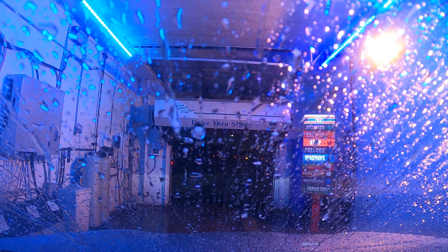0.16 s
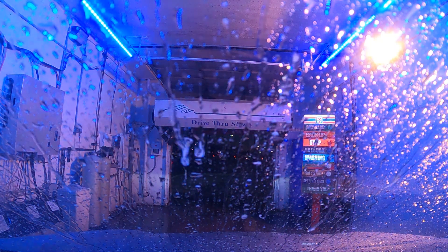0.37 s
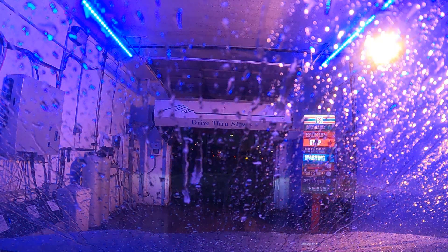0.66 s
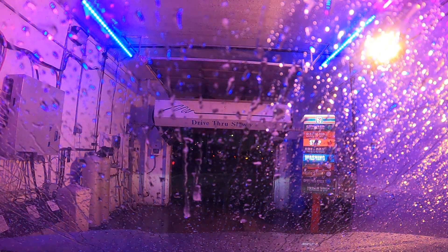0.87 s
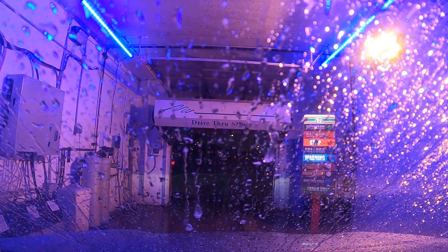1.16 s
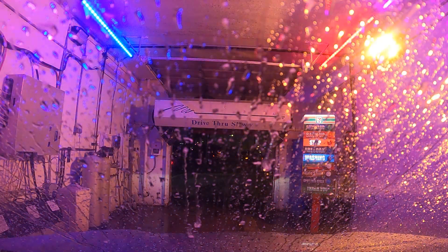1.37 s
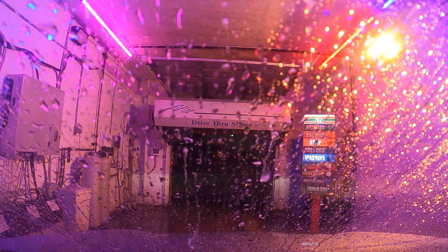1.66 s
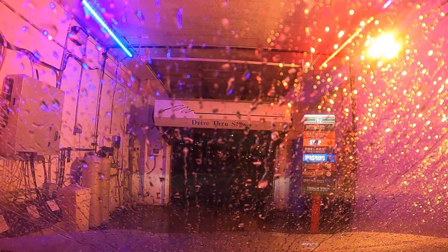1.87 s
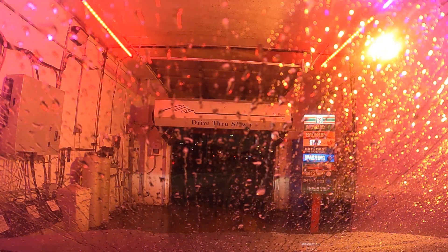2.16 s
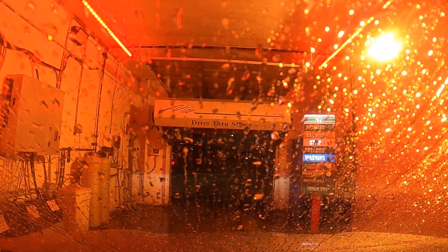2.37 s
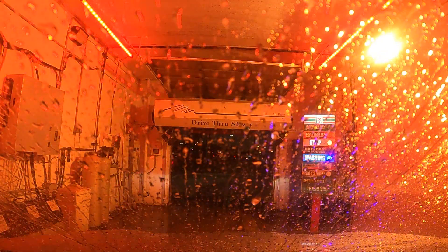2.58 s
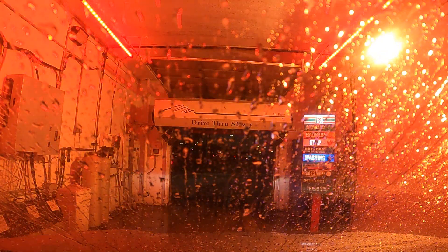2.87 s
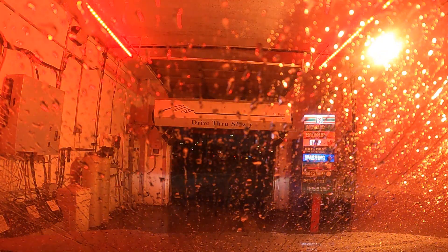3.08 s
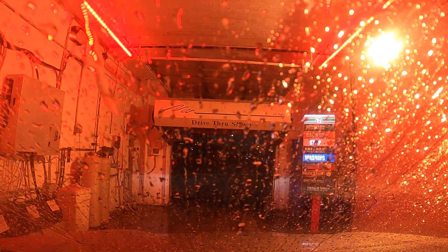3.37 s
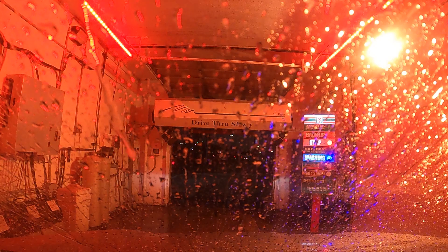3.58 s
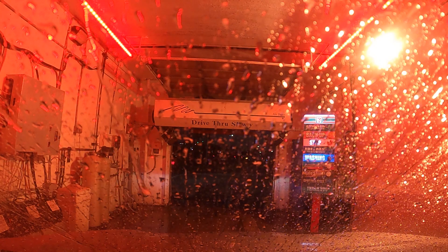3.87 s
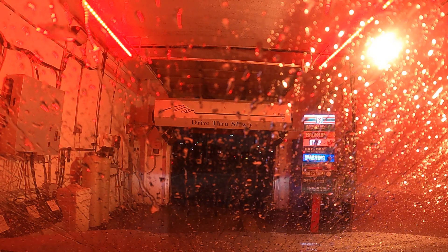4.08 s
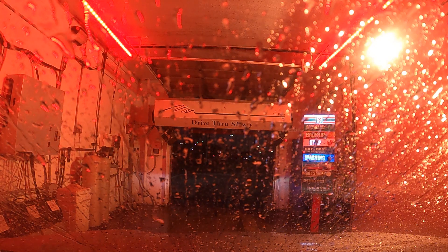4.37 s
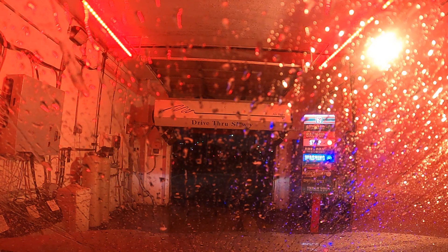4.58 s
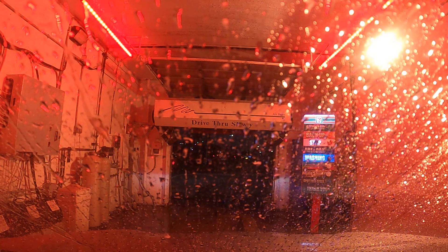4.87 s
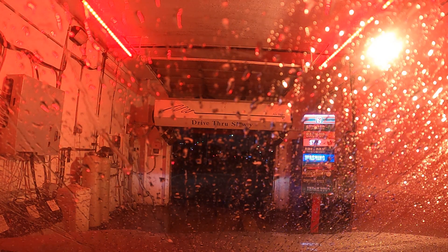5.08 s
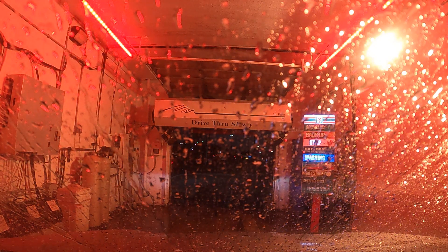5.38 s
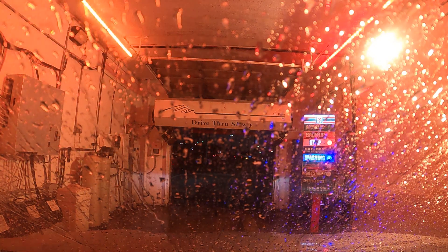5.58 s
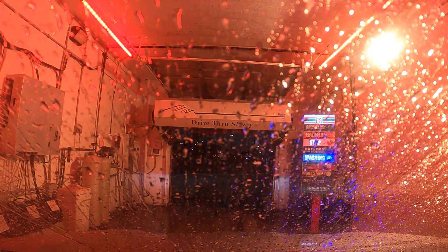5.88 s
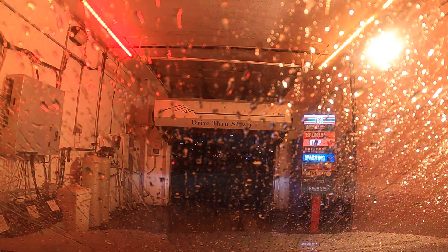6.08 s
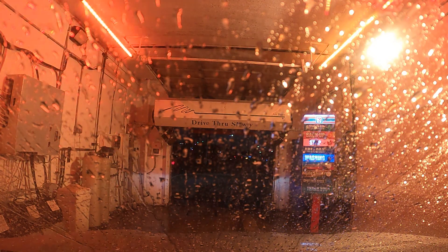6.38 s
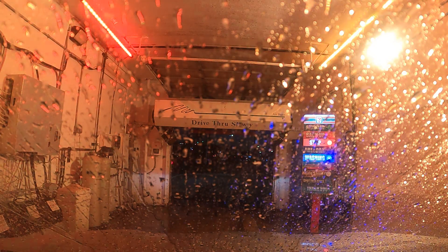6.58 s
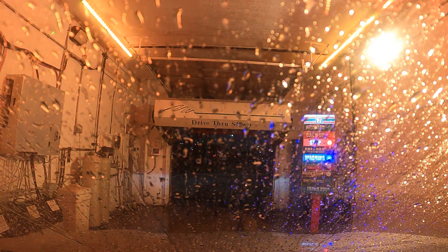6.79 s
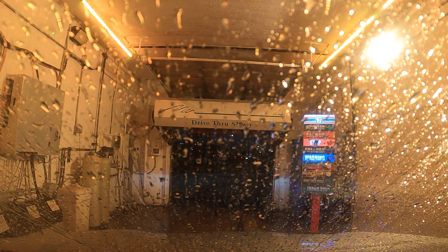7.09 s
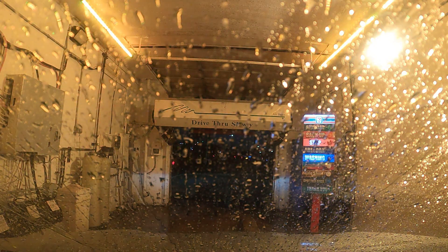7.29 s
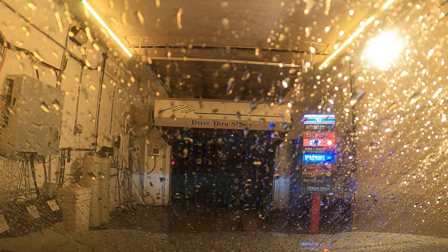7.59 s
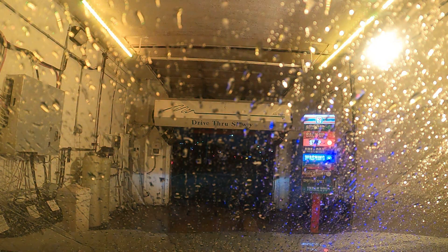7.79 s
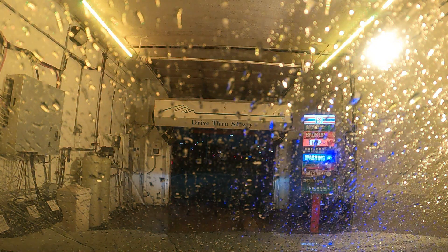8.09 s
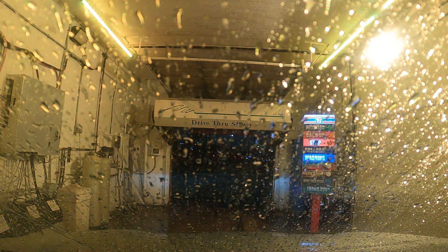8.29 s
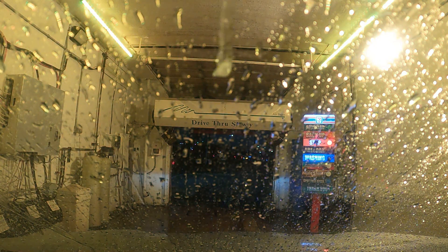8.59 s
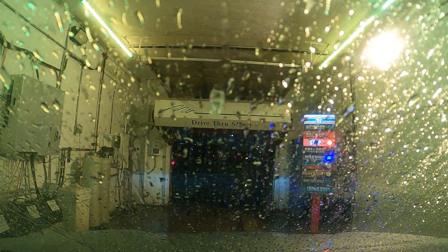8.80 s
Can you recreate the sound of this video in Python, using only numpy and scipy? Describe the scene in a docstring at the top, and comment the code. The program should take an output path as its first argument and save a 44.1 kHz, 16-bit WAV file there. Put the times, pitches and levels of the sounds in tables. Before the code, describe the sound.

Inside a closed car in an automatic wash, water drums on the roof and splats on the windshield over a low rumble, then dies down.

```python
"""Inside a closed car in an automatic wash. At first machinery rumbles and hums, made of coloured noise and a wavering
tone, while showers of tiny noise bursts drum on the roof and patter on the windshield, and fat drops splat.
At about 2 s the spray moves off the glass, grazing the panels; near 5 s a large panel booms and the hum swells.
Close to 7 s a last jet sweeps over the panels and is shut off. A valve then hisses, the droplets on the glass
stop, the spray on the body grows faint and the hum of the wash bay remains."""
import sys
import numpy as np
from scipy import signal
from scipy.fft import rfft, irfft, next_fast_len
from scipy.io import wavfile
from scipy.ndimage import uniform_filter1d

SR = 44100
rng = np.random.default_rng(int(sys.argv[2]) if len(sys.argv) > 2 else 0)


def int16_out(signal):
    """Quantize to a 16-bit WAV file."""
    q = np.round(np.clip(np.atleast_2d(signal).T, -1, 1) * 32767)
    wavfile.write(sys.argv[1], SR, q.astype(np.int16))


N = 394254
T = np.arange(N) / SR  # time of every sample [s]
SIZE = next_fast_len(N + SR // 4, True)  # transform length, with room for ringing
HZ = np.maximum(np.fft.rfftfreq(SIZE, 1 / SR), 1)

# tone colour of a drop splatting on the glass: (frequency [Hz], relative level [dB])
SPLAT_COLOUR = [(900, -17), (2000, -1.5), (2700, 2.5), (3700, 1), (4500, -2.5), (5600, -13.5), (8000, -23),
                (15000, -45)]
# tone colour of fine spatter: (frequency [Hz], relative level [dB])
SPATTER_COLOUR = [(3500, -14), (6000, 0), (7600, 0), (8600, -6.5), (10400, -8), (12500, -20), (15000, -37)]

# the spray starts to leave the windshield, and how long it takes to move on
SPRAY_LEAVES_S, SPRAY_MOVE_S = 1.77, 1
# how fast a jet swells as it nears and fades as it goes
JET_RISE_DB_PER_S, JET_FALL_DB_PER_S = 42, 40


def undb(db):
    """Turn decibels into gain."""
    return 10 ** (np.asarray(db) / 20)


def unit(x):
    """Scale to an rms of one."""
    return x / np.sqrt(np.mean(x ** 2))


def curve(rows):
    """Read a (time, level) table at every sample, with straight lines between its points."""
    s, db = np.transpose(rows)
    return np.interp(T, s, db)


def spectrum(points):
    """Gain at every frequency from (Hz, dB) points."""
    hz, db = np.transpose(points)
    return undb(np.interp(np.log(HZ), np.log(hz), db))


def colour(points):
    """Filter with the given spectrum that only rings after a blow, never before it."""
    cepstrum = irfft(np.log(spectrum(points)))
    # folding the second half onto the first removes any sound ahead of the blow
    cepstrum[1:SIZE // 2] *= 2
    cepstrum[SIZE // 2 + 1:] = 0
    return np.exp(rfft(cepstrum))


def resonances(modes):
    """Filter made of damped modes (Hz, width Hz, dB); neighbours swing in opposite directions."""
    response = 0
    for k, (hz, width, db) in enumerate(modes):
        mode = undb(db) / (1 + 1j * (HZ ** 2 - hz ** 2) / (HZ * width))
        response = response + (-1) ** k * mode
    return response


def cabin(pair, response):
    """Filter a direct and a reflected signal into left and right: bass is shared, treble spreads out."""
    # width of the sound in the cabin: (frequency [Hz], side minus mid [dB])
    width_points = [(60, -35), (150, -19.5), (350, -14), (700, -12), (1400, -8.5), (2600, -4.5),
                    (5000, -9.5), (8000, -4), (12000, -7.5)]
    # lean to one side: (frequency [Hz], left minus right [dB])
    lean_points = [(50, 1.3), (250, .7), (600, -.8), (2500, .1), (8000, -.4)]
    mid, side = rfft(pair, SIZE) * response
    side = side * spectrum(width_points)
    lean = np.sqrt(spectrum(lean_points))  # half of the lean goes to each ear
    left, right = (mid + side) * lean, (mid - side) / lean
    return irfft(np.array([left, right]))[:, :N]


def noise():
    """Two unrelated white noises."""
    return rng.standard_normal((2, N))


def walk(rate):
    """Slow random wander: levels held for 1 / rate seconds, then smoothed twice; spread near 1."""
    k = int(SR / rate)
    steps = np.repeat(rng.standard_normal(N // k + 1), k)
    smooth = uniform_filter1d(uniform_filter1d(steps, k), k)
    return unit(smooth[:N])


def gust(start_s, attack_s, hold_s, fall_db_per_s):
    """Gain of something switched on: a quick rise, a hold and an even decay."""
    rise = np.clip((T - start_s) / attack_s, 0, 1)
    falling_s = np.maximum(T - start_s - attack_s - hold_s, 0)
    return rise * undb(-fall_db_per_s * falling_s)


def sweep(full_s, leaves_s, rise_db_per_s, fall_db_per_s):
    """Gain of something that draws near, stays and moves off."""
    before_s, after_s = np.maximum(full_s - T, 0), np.maximum(T - leaves_s, 0)
    return undb(-rise_db_per_s * before_s - fall_db_per_s * after_s)


def fade(splash_s, tail_db, tail_s):
    """Envelope of one impact: the drop spreads and collapses, then weak reflections die in the upholstery."""
    t = T[:SR // 8]
    return np.exp(-(t / splash_s) ** 2) + undb(tail_db) * np.exp(-t / tail_s)


def shower(per_s, spread_db, splash_s, tail_db):
    """Random droplets, many small and a few large; each is a tiny burst, and their powers add."""
    size = undb(spread_db * np.minimum(rng.exponential(size=N), 5))
    hits = (rng.random(N) < per_s / SR) * size
    power = signal.oaconvolve(hits ** 2, fade(splash_s, tail_db, .016) ** 2)[:N]
    return unit(noise() * np.sqrt(np.abs(power)))


def splash(hit, hz):
    """A pocket of trapped air rings at its pitch within the splash; a lower drop also splashes duller."""
    pocket = signal.lfilter(*signal.iirpeak(hz, 6, fs=SR), hit)  # 6 is the sharpness of the ring
    hit = .8 * hit + 1.6 * pocket
    return signal.lfilter(*signal.butter(2, 1.6 * hz, fs=SR), hit)


def strikes(times, levels_db, lengths_s, tail_db, pitches_hz=None):
    """One noise burst at each given time, as long as the drop spreads; with a pitch, trapped air rings in it."""
    spread_share, cabin_tail_s = 0.26, 0.021  # share of the length spent building up; lingering in the cabin
    out = np.zeros((2, N + SR))
    for k, (s, db, length_s) in enumerate(zip(times, levels_db, lengths_s)):
        envelope = fade(length_s, tail_db, cabin_tail_s)
        envelope = envelope * np.minimum(T[:len(envelope)] / (spread_share * length_s), 1)
        hit = rng.standard_normal((2, len(envelope))) * envelope
        if pitches_hz is not None:
            hit = splash(hit, pitches_hz[k])
        start = int(s * SR)
        out[:, start:start + len(envelope)] += undb(db) * hit
    return out[:, :N]


def pane(points):
    """A colour together with the quick reflections from dashboard, side windows and pillars."""
    # reflections after the direct sound: (delay [s], level against the direct sound [dB])
    reflections = [(.0023, -17), (.0058, -16), (.0086, -15)]
    lag_s, db = np.transpose(reflections)
    response = np.zeros(SIZE)
    response[0] = 1
    response[(lag_s * SR).astype(int)] += undb(db)
    return colour(points) * rfft(response) / np.linalg.norm(response)


def body():
    """Response of the doors and glass, which lift whatever water hits them at their own modes."""
    # modes of the doors and glass: (frequency [Hz], lift [dB])
    modes = [(505, 3), (580, 3.5), (750, 3.5), (1025, 5), (1190, 2.5), (1630, 3.5)]
    width_hz = 23
    lifts = [1 + (undb(db) - 1) * resonances([(hz, width_hz, 0)]) for hz, db in modes]
    return np.prod(lifts, axis=0)


def machinery():
    """The running bay: a steady wash of noise, a low motor hum and a rumble that shakes the cabin."""
    # tone colour of the wash bay: (frequency [Hz], relative level [dB])
    bay_colour = [(12, -30.5), (35, -8), (60, -4.5), (110, -8), (190, -11.5), (270, -23.5), (700, -34),
                  (1000, -34), (2200, -51), (3200, -53), (5000, -55.5), (8000, -70.5), (15000, -90.5)]
    # tone colour of the rumble: (frequency [Hz], relative level [dB])
    rumble_colour = [(12, -30.5), (24, -19.5), (33, 5.5), (44, -4), (54, 2.5), (70, 0.5), (90, -3.5),
                     (130, -23.5), (250, -39.5), (3000, -130)]
    # course of the rumble: (time [s], relative level [dB])
    rumble_course = [(0, -22), (.6, -23), (1.75, -27), (2.3, -37.5), (3.1, -25.5), (4.2, -30), (5.9, -27),
                     (6.8, -31.5), (7.7, -31.5), (8.3, -42.5), (8.94, -34.5)]
    bay = unit(cabin(noise(), colour(bay_colour))) * undb(-28.5 + .5 * walk(5.5))
    # the hum swells for a while
    swell = gust(4.92, attack_s=.17, hold_s=.41, fall_db_per_s=19.5)
    hum_gain = undb(-38) + undb(-32.5) * swell
    hum_hz = 33.5 + 0.73 * walk(10.0)
    hum = unit(np.sin(2 * np.pi * np.cumsum(hum_hz) / SR)) * hum_gain * undb(3.0 * walk(4.8))
    rumble = unit(cabin(noise(), colour(rumble_colour)))
    return bay + hum + rumble * undb(curve(rumble_course) + 1.5)


def boom():
    """A large panel swings unsteadily at a low pitch that sinks as the spray moves along it."""
    full_s, leaves_s = 4.75, 5.04
    hz = 55.2 - 6 * (T - full_s)  # sinks by 6 Hz each second
    swing = unit(np.sin(2 * np.pi * np.cumsum(hz + 2.4 * walk(16)) / SR)) * undb(2.0 * walk(9))
    drive = sweep(full_s, leaves_s, rise_db_per_s=6, fall_db_per_s=13.5)
    return cabin(np.array([swing, swing]) * drive, undb(-22.5))


def air_valve():
    """Compressed air hisses out abruptly and dies away in the bay."""
    # tone colour of the escaping air: (frequency [Hz], relative level [dB])
    air_colour = [(1200, -32), (2200, -16), (2900, -9), (3200, -1.5), (3500, 2.7), (4200, -.3), (4900, .5),
                  (6000, -10), (8000, -18.5), (10500, -24), (15000, -52)]
    opening = gust(7.478, attack_s=.012, hold_s=.135, fall_db_per_s=41)
    return unit(cabin(noise(), colour(air_colour))) * undb(-48.5) * opening


def jet_force():
    """Gain of the last jet: it swells, drops to a dribble when shut off and dies away."""
    full_s, shut_s, cut_s = 6.62, 6.872, .025
    full_db, dribble_db = -30, -5  # the dribble is against the full jet
    shut_db = dribble_db * np.clip((T - shut_s) / cut_s, 0, 1)
    return sweep(full_s, shut_s, JET_RISE_DB_PER_S, JET_FALL_DB_PER_S) * undb(full_db + shut_db)


def jet():
    """A hard jet rushes over the metal panels, which the first spray also grazes; single slugs of water slap them."""
    # resonances of the panels: (frequency [Hz], width [Hz], relative level [dB])
    panel_modes = [(350, 90, 5), (610, 240, -2), (779, 103, 3), (1030, 52, 3.5), (1216, 104, -3.5),
                   (1600, 220, -12), (2130, 140, -14.5)]
    # slugs of water slapping the panels: (time [s], relative level [dB], length [s])
    slugs = [(0.424, -20.5, 0.011), (0.555, -21, 0.015), (0.67, -19.5, 0.012), (1.443, -19.5, 0.0054),
             (1.487, -19, .006), (1.514, -15, 0.0099), (2.279, -20, .017), (5.114, -26, 0.027),
             (6.186, -24.5, .018), (6.845, -23, .022), (6.974, -15.5, 0.012)]
    panel_colour = [(200, -5.5), (600, -2), (2200, 0.0), (4000, -14), (8000, -28.0), (15000, -48.0)]
    panel = resonances(panel_modes) * colour(panel_colour)
    stream = unit(cabin(shower(per_s=900, spread_db=2.1, splash_s=.003, tail_db=-13), panel))
    s, slap_db, length_s = np.transpose(slugs)
    slaps = cabin(strikes(s, slap_db + 7, length_s, tail_db=-9), panel)
    flutter = undb(1.4 * walk(36))
    # the first spray grazes the panels as it leaves the windshield
    graze = undb(-37) * sweep(1.83, 2.13, JET_RISE_DB_PER_S, JET_FALL_DB_PER_S)
    return stream * (jet_force() + graze) * flutter + slaps


def fat_drops():
    """Each fat drop splats on the glass, rings the pane and throws a fine spatter."""
    # fat drops: (time [s], relative splat level [dB], splat pitch [Hz], relative pane ring level [dB],
    # relative fine spatter level [dB], splash length [s])
    drops = [(.118, -30.5, 3340, -33.5, -74, .008), (0.147, -45, 3200, -35, -73, .009),
             (0.187, -34.5, 3000, -31, -74, 0.0066), (0.279, -36, 3100, -39, -74, .009),
             (.333, -46, 3400, -41, -68, .009), (0.514, -38.5, 3300, -37, -68, .009),
             (0.564, -36, 3140, -36.5, -74, 0.0096), (0.634, -45, 3300, -34.5, -67, 0.0086),
             (0.67, -38, 2700, -36, -67, 0.0079), (0.952, -34, 3320, -37, -67, 0.004),
             (0.972, -42, 3600, -33, -68, .011), (1.002, -27, 3170, -31.5, -67, 0.013),
             (1.115, -42, 3480, -35.5, -68, 0.013), (1.152, -32.5, 2970, -33, -73, 0.0064),
             (1.258, -37, 3070, -31.5, -69, 0.0081), (1.322, -39, 3500, -35.5, -72, 0.015),
             (1.345, -36, 3500, -35, -68, 0.0083), (1.373, -37, 3630, -34.5, -64, 0.0091),
             (1.383, -32.5, 3400, -33, -67, 0.012), (1.511, -33, 2600, -31.5, -66, 0.011),
             (1.523, -31.5, 3120, -37, -66, 0.011), (1.572, -40, 3700, -51, -73, 0.011),
             (1.65, -30, 2750, -23.5, -62, 0.0066), (1.741, -30.5, 3500, -33.5, -64, .011),
             (1.789, -31.5, 2900, -34, -67, 0.0078), (1.882, -43, 3100, -32, -68, 0.0074),
             (2.342, -40.5, 3000, -40.5, -72, 0.014), (2.406, -43, 3000, -50, -74, .008),
             (2.473, -39, 2630, -39, -75, .009), (2.513, -37.5, 2800, -30.5, -73, 0.01),
             (2.809, -49, 3000, -38, -72, 0.022), (3.048, -44, 3000, -39, -70, 0.012),
             (3.202, -41.5, 2880, -40, -72, 0.011), (3.272, -43.5, 2640, -45, -74, 0.0082),
             (3.422, -45, 3000, -46, -75, .008), (3.476, -51, 2810, -49, -67, 0.0082),
             (4.029, -43.5, 2500, -42.5, -77, 0.013), (4.116, -41, 2620, -51, -76, 0.0082),
             (4.338, -50, 3420, -45, -70, 0.024), (4.71, -36, 2760, -36, -72, 0.0075),
             (4.751, -38, 2700, -34.5, -67, 0.014), (4.804, -49, 3600, -49, -70, .008),
             (4.8723, -30, 3030, -32, -71, 0.012), (4.953, -42, 3040, -46, -75, 0.012),
             (5.076, -43, 3500, -46, -75, .009), (5.145, -45, 2980, -47.5, -76, .009),
             (5.219, -47, 3180, -48, -77, .01), (5.595, -43, 3400, -44, -66, 0.0083),
             (5.698, -36.5, 2560, -45, -78, 0.0093), (5.76, -37, 2170, -39.5, -65, 0.013),
             (5.79, -37, 2380, -47, -78, .011), (6.638, -46, 2200, -39, -80, .016),
             (6.758, -49, 3300, -34.5, -76, 0.028), (6.845, -41, 2200, -33, -75, 0.016)]
    # tone colour of the ringing pane: (frequency [Hz], relative level [dB])
    ring_colour = [(500, -30.5), (1000, -1.5), (1600, -3.5), (2100, -10), (3500, -52.5), (15000, -91)]
    s, splat_db, splat_hz, ring_db, spatter_db, length_s = np.transpose(drops)
    splat_hits = strikes(s, splat_db - 0.5, length_s, tail_db=-5.0, pitches_hz=splat_hz)
    ring_hits = strikes(s, ring_db + 10.5, length_s, tail_db=-2.5)
    # the fine spatter flies for longer than the splash lasts
    spatter_hits = strikes(s, spatter_db + 13.5, length_s * 1.35, tail_db=-4.5)
    splat = cabin(splat_hits, pane(SPLAT_COLOUR))
    ring = cabin(ring_hits, colour(ring_colour) * body())
    spatter = cabin(spatter_hits, colour(SPATTER_COLOUR))
    return splat + ring + spatter


def drips():
    """Single small drops at random moments, each with its own size and pitch."""
    per_s, length_s, low_hz, high_hz, range_db = 38, .0055, 2350, 3700, 14
    when, size, pitch = rng.random((int(per_s * N / SR), 3)).T
    pitches_hz = low_hz + (high_hz - low_hz) * pitch
    lengths_s = np.full(len(when), length_s)
    hits = strikes(when * T[-1], -range_db * size, lengths_s, tail_db=-9, pitches_hz=pitches_hz)
    return unit(cabin(hits, pane(SPLAT_COLOUR)))


def glass_wetting():
    """Gain of the droplets on the windshield: full spray, then thinning mist, and mist from the last jet."""
    water_off_s, drain_s = 7.4, 1
    since = np.maximum(T - SPRAY_LEAVES_S, 0)
    # a step down as the spray moves on, along with a steady fall of 2 dB per second
    mist = undb(-48 - 2.5 * np.minimum(since / SPRAY_MOVE_S, 1) - 2 * since)
    running = np.clip(1 - (T - water_off_s) / drain_s, 0, 1)
    jet_mist = jet_force() * undb(-21)
    return np.hypot(mist * running, jet_mist)


def spray(flow_db):
    """Sheets of water wash over the body while droplets tick on the windshield."""
    # tone colour of water washing over the body: (frequency [Hz], relative level [dB])
    wash_colour = [(200, -13.5), (310, -1.5), (390, -4.5), (470, -1.5), (590, -4), (680, -7.5), (900, -8.5),
                   (1150, -11.5), (1600, -20), (2100, -28), (3200, -35.5), (15000, -100)]
    # tone colour of droplets on the glass: (frequency [Hz], relative level [dB])
    glass_colour = [(500, -16), (780, 8), (1150, 5), (1500, 7.5), (2300, -3.5), (2850, -2), (3700, -4),
                    (5000, -7.5), (6300, -16), (7700, -20), (8500, -27.5), (10400, -28), (11800, -36),
                    (15000, -57)]
    modes = body()
    sheet_drops = shower(per_s=3000, spread_db=2.3, splash_s=.002, tail_db=-14)
    sheet = unit(cabin(sheet_drops, colour(wash_colour) * modes))
    tick_drops = shower(per_s=1100, spread_db=2.7, splash_s=.0028, tail_db=-14)
    ticks = unit(cabin(tick_drops, colour(glass_colour) * modes))
    # heavier drops come singly, and some burst into a fine spatter
    spatter_drops = shower(per_s=14, spread_db=2.2, splash_s=.014, tail_db=-6)
    spatter = unit(cabin(spatter_drops, colour(SPATTER_COLOUR)))
    surge_db = 1.5 * walk(11)
    glass = ticks * undb(4.0 + surge_db) + drips() * undb(-6) + spatter * undb(-26.0)
    # the wash changes by 0.96 dB for each dB of flow
    wash = sheet * undb(-31.5 + 0.96 * flow_db + 0.9 * walk(23))
    return wash + glass * glass_wetting()


def roof(flow_db):
    """Dense heavy drops drum on the roof, ringing it differently once the spray moves on; the lining dulls them."""
    # roof and cabin resonances: (frequency [Hz], width [Hz], relative level with the spray at the front [dB],
    # relative level once it has moved on [dB])
    roof_modes = [(117.8, 29.7, 0.5, 0), (165.3, 34, -2.5, -3), (205.7, 28.2, -0.5, -2),
                  (245, 17.2, 3, 1.5), (316.2, 60, -5, -6.5)]
    headliner = colour([(50, -23.0), (100, 1.5), (340, -2.5), (600, -13.5), (1500, -45.0), (15000, -100)])
    drops = shower(per_s=1800, spread_db=3.0, splash_s=0.00093, tail_db=-25.0)
    hz, width, front_db, back_db = np.transpose(roof_modes)
    front = unit(cabin(drops, resonances(zip(hz, width, front_db)) * headliner))
    back = unit(cabin(drops, resonances(zip(hz, width, back_db)) * headliner))
    moved = np.clip((T - SPRAY_LEAVES_S) / SPRAY_MOVE_S, 0, 1)
    drumming = front * (1 - moved) + back * moved
    # the drumming changes by 1.25 dB for each dB of flow
    return drumming * undb(-22 + 1.25 * flow_db + 0.82 * walk(7.0))


def scene():
    """Everything as it reaches the front seats; one flow of water drives both the drumming and the wash."""
    # spray landing on the body: (time [s], flow [dB])
    flow = [(0, -0.5), (.8, -1.5), (1.8, 0.5), (2.15, -3), (4, -2.5), (4.9, -4), (6, -2.5), (6.9, -10.5),
            (7.7, -7), (8.2, -15), (8.94, -15)]
    flow_db = curve(flow)
    background = machinery() + boom() + air_valve()
    return background + jet() + fat_drops() + spray(flow_db) + roof(flow_db)


def record(dry):
    """A steep low-pass filter cuts the treble above 14900 Hz."""
    low_pass = signal.ellip(8, .2, 70, 14900, fs=SR, output="sos")
    return signal.sosfilt(low_pass, dry)


dry = scene()
out = record(dry)
int16_out(out)
```